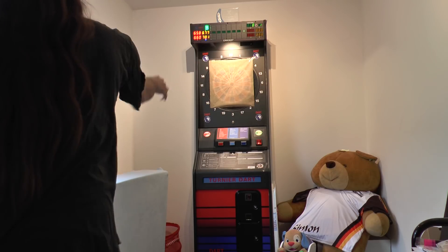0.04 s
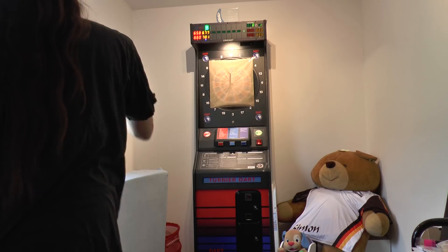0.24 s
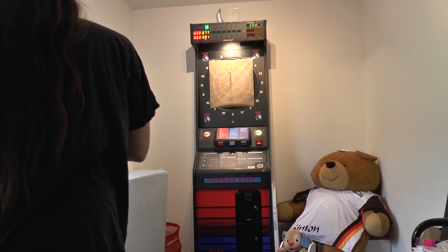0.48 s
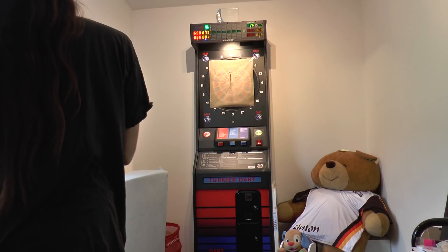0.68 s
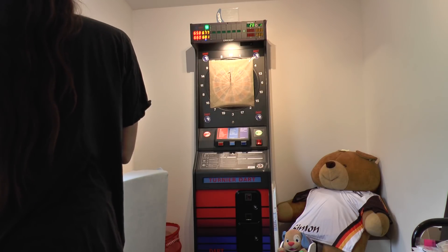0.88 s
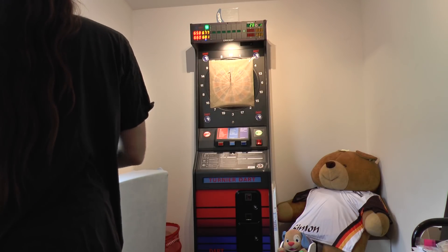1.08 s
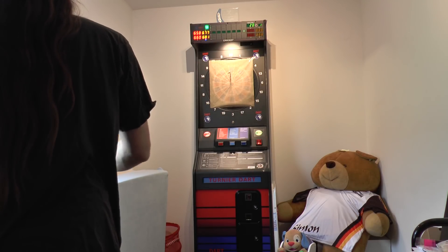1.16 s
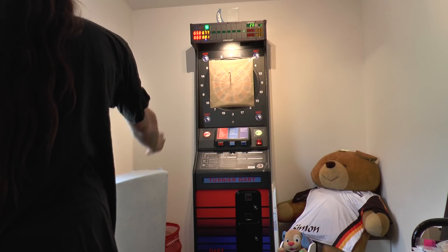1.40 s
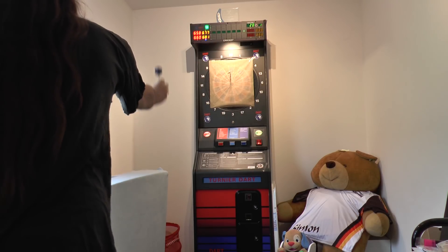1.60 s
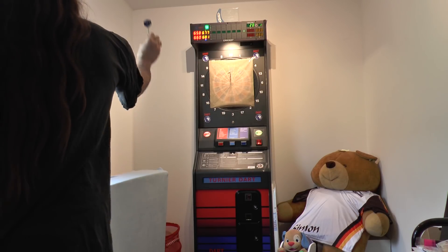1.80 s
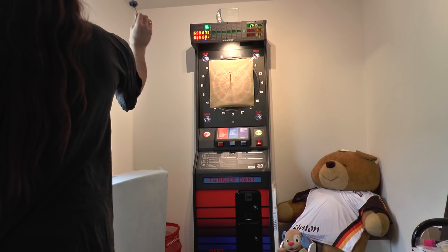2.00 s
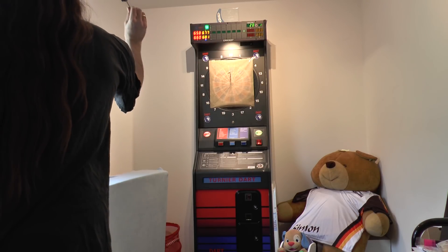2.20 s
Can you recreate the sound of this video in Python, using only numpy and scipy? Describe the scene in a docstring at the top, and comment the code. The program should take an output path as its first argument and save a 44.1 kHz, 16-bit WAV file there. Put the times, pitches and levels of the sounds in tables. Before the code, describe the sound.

Dart hit on an electronic dartboard, loud plastic crack, settling clicks, then faint rustle and scrape

```python
"""Dart into an electronic board.

A dart tears a paper sheet and hits a plastic board in a small, bare room: the segment cracks and
the cabinet booms (decaying sines), then the dart settles with a few clicks (filtered impulses).
The thrower draws the next dart: flights rustle, barrels scrape, clothes brush, feet shift (random slips).
Fan tones of the machine (wavering sines) and room air (filtered noise) run throughout."""
import sys
import numpy as np
from scipy import signal
from scipy.fft import rfft, irfft
from scipy.io import wavfile

SR = 44100
rng = np.random.default_rng(int(sys.argv[2]) if len(sys.argv) > 2 else 0)


def bounce(signal):
    """Save signal as a 16-bit WAV file at the path given by the first command-line argument."""
    frames = np.transpose(np.atleast_2d(signal))
    limited = np.clip(frames, -1, 1)
    pcm = np.round(limited * 32767).astype(np.int16)
    wavfile.write(sys.argv[1], SR, pcm)


N = 99225
TIME = np.arange(N) / SR  # s


def amp(db):
    """Decibels to gain."""
    return 10 ** (np.asarray(db) / 20)


def unit(x):
    """Scales to rms 1."""
    return x / np.sqrt(np.mean(x ** 2) + 1e-20)


def read(points, hz):
    """Interpolates a table on a log-frequency axis."""
    f, value = np.transpose(points)
    return np.interp(np.log(hz + 1), np.log(f + 1), value)


def envelope(points):
    """Gain over time from a table of t/s, level/dB."""
    return amp(np.interp(TIME, *np.transpose(points)))


def through(x, response):
    """Convolves with a response scaled to energy 1."""
    return signal.fftconvolve(x, response / np.linalg.norm(response))[:N]


def colour(x, points, size=4096):
    """Minimum-phase filter with the given spectrum shape, energy 1."""
    hz = abs(np.fft.fftfreq(size, 1 / SR))
    log_gain = np.log(amp(read(points, hz)))
    spectrum = np.exp(np.conj(signal.hilbert(log_gain)))
    return through(x, np.fft.ifft(spectrum).real[:size // 2])


def high_pass(x, hz):
    """Removes the bass, second order."""
    return signal.sosfilt(signal.butter(2, hz, "high", fs=SR, output="sos"), x)


def ring(modes):
    """Impulse response of damped modes: one second of decaying sines."""
    t = TIME[:SR]
    response = np.zeros(SR)
    for hz, db, t60 in modes:
        decay = np.exp(-np.log(1000) * t / t60)
        response += amp(db) * decay * np.sin(2 * np.pi * hz * t)
    return response


def clicks(rows):
    """One impulse for each (t/s, level/dB)."""
    out = np.zeros(N)
    for s, db in rows:
        out[round(s * SR)] += amp(db)
    return out


def drift(per_s):
    """Slow random waver of rms 1: noise under a Gaussian low-pass."""
    spectrum = rfft(rng.standard_normal(N))
    hz = np.fft.rfftfreq(N, 1 / SR)
    return unit(irfft(spectrum * np.exp(-(hz / per_s) ** 2), N))


RUB_ATTACK_S = .002


def rub(start_s, length_s, db, slips_per_s, spread_db, release_s):
    """Friction: a gated stroke of tiny random slips of uneven strength."""
    hits = rng.random(N) < slips_per_s / SR
    signs = rng.choice([-1, 1], N)
    strengths = amp(spread_db * np.minimum(rng.exponential(1, N), 3))
    attack = np.clip((TIME - start_s) / RUB_ATTACK_S, 0, 1)
    release = np.exp(-np.maximum(TIME - start_s - length_s, 0) / release_s)
    return amp(db) * attack * release * unit(hits * signs * strengths)


# Reverberation time: f/Hz, t60/s
ROOM_T60_S = [(80, 0.2), (210, 0.59), (560, 0.45), (1500, 0.36), (3500, 0.46), (7000, 0.29), (11000, .36),
              (16000, 0.35)]
ROOM_GAP_S, REFLECTIONS_PER_S = 0.0016, 5000


def tail():
    """Sparse wall reflections, each band dying at its own speed."""
    signs = rng.choice([-1., 1.], SR)
    present = rng.random(SR) < REFLECTIONS_PER_S / SR
    taps = signs * present * (TIME[:SR] > ROOM_GAP_S)
    hz, t, bands = signal.stft(taps, SR, nperseg=256)
    decay = np.exp(-np.log(1000) * t / read(ROOM_T60_S, hz)[:, None])
    return signal.istft(bands * decay, SR, nperseg=256)[1]


def stereo(mid, side, width):
    """Mid and side to left and right, side level set per frequency."""
    hz = np.fft.rfftfreq(2 * N, 1 / SR)
    side = irfft(rfft(side, 2 * N) * amp(read(width, hz)))[:N]
    return np.array([mid + side, mid - side])


# Stereo width of the reflections: f/Hz, side gain/dB
ECHO_WIDTH_DB = [(60, -23), (200, -20), (600, -14.5), (1500, -11), (3000, -11), (8500, -12), (11000, -35)]


def echoes(x):
    """What the walls send back: independent tails for mid and side."""
    return stereo(through(x, tail()), through(x, tail()), ECHO_WIDTH_DB)


def room(x, wet_db):
    """Direct sound plus the reflections."""
    return x + amp(wet_db) * echoes(x)


# Fan tones before swell and flutter: f/Hz, level/dB
FAN_TONES = [(157, -67), (243, -64.5)]
# Common swell of the fan tones: t/s, level/dB
FAN_SWELL_DB = [(0, -7), (.13, 6), (.7, -5.5), (.98, 3), (1.3, -5.5), (1.7, 1), (1.87, 6), (2.0, -0.5),
                (2.25, -2.5)]
FAN_WAVER_HZ, FAN_FLUTTER_DB, WAVER_PER_S = 1.8, 2.5, 5
# Spectrum shape of the room air: f/Hz, level/dB
AIR_SPECTRUM_DB = [(20, -41), (42, -6), (60, -13), (100, -3), (140, -1), (190, -6), (260, -5), (380, -15.5),
                   (700, -21.5), (1800, -20.5), (4000, -27.5), (7000, -31.5), (8600, -33.5), (10500, -29.5),
                   (14500, -32), (16000, -41.5)]
# Stereo width of the air: f/Hz, side gain/dB
AIR_WIDTH_DB = [(60, -12.5), (150, -13), (380, 0.5), (800, 1), (2400, -10.5), (6000, -8.5), (11000, -22)]
AIR_DB = -62


def background():
    """Fan tones wavering in pitch and level, over filtered-noise room air."""
    hum = np.zeros(N)
    for hz, db in FAN_TONES:
        level = amp(db + FAN_FLUTTER_DB * drift(WAVER_PER_S))
        pitch_hz = hz + FAN_WAVER_HZ * drift(WAVER_PER_S)
        hum += level * unit(np.sin(2 * np.pi * np.cumsum(pitch_hz) / SR))
    hum *= envelope(FAN_SWELL_DB)
    mid, side = (amp(AIR_DB) * colour(x, AIR_SPECTRUM_DB) for x in rng.standard_normal((2, N)))
    return stereo(mid + hum, side, AIR_WIDTH_DB)


# Clothes, level over time: t/s, level/dB
SLEEVE_DB = [(0, -58.5), (.07, -60.5), (.16, -65.5), (.6, -61.5), (1.05, -68), (1.27, -72.5), (1.34, -65),
             (1.5, -64.5), (1.6, -69.5), (1.7, -68), (1.95, -75), (2.25, -100)]
# Spectrum shape of the cloth: f/Hz, level/dB
CLOTH_SPECTRUM_DB = [(100, 2.5), (400, -3), (700, -4), (1700, -4), (2400, -7), (3200, -5), (4200, -14.5),
                     (6500, -11.5), (9000, -19), (15000, -30)]
# Soft shuffles of the feet: start t/s, length/s, level/dB
FOOT_SHUFFLES = [(1.109, 0.022, -57), (2.06, .014, -55), (2.076, .006, -59)]
# Spectrum shape of the shuffles: f/Hz, level/dB
SHUFFLE_SPECTRUM_DB = [(60, -8.5), (300, 5), (550, 0.5), (1100, 2), (2000, -8), (3300, -12), (5000, -25),
                       (15000, -51)]


def thrower():
    """Friction of clothes as the arm moves; short rubs as the feet shift."""
    cloth = rub(0, N / SR, 0, slips_per_s=6400, spread_db=1.5, release_s=0.0025)
    cloth = cloth * envelope(SLEEVE_DB)
    feet = sum(rub(*row, slips_per_s=4000, spread_db=4, release_s=0.0044) for row in FOOT_SHUFFLES)
    brushing = room(colour(cloth, CLOTH_SPECTRUM_DB), wet_db=-5)
    return brushing + room(colour(feet, SHUFFLE_SPECTRUM_DB), wet_db=-6)


# Barrels sliding on each other: start t/s, length/s, level/dB, shaft drive/dB, barrel drive/dB
BARREL_SCRAPES = [(0.765, 0.016, -56.5, -5, 11), (0.784, 0.045, -51.5, -2.5, 4.5),
                  (0.83, 0.026, -42.5, -5.5, -9), (0.864, 0.006, -44.5, 1.5, -12.5),
                  (0.872, 0.018, -47, 2.5, -21)]
# Spectrum shape of the scrape: f/Hz, level/dB
SCRAPE_SPECTRUM_DB = [(200, -13), (600, -14.5), (1000, -18), (2500, 2.5), (4000, 3.5), (5100, 7.5),
                      (6400, 2.5), (7500, 4), (10000, -3.5), (15500, -13.5)]
# Shaft modes: f/Hz, relative level/dB, t60/s
SHAFT_MODES = [(1030, -5, 0.014), (1841, -0.5, 0.047), (1990, 5, 0.024), (2290, 2, 0.027),
               (3470, -7, 0.019)]
# Barrel modes: f/Hz, relative level/dB, t60/s
BARREL_MODES = [(5500, -9, 0.024), (5430, -7, 0.019), (5840, 2, 0.019), (7230, -8, 0.014),
                (8960, -9, 0.0088)]
SHAFT_DB, BARREL_DB, SCRAPE_DB = -4, -6.5, -2.5
SHAFT_CUT_HZ = 800
# Spectrum shape of the first metal touch: f/Hz, level/dB
CLINK_SPECTRUM_DB = [(500, -37), (4000, -24), (8000, -1), (11000, 8), (15500, -1.5)]
CLINK_S, CLINK_LENGTH_S, CLINK_DB = .7685, .01, -49


def barrels():
    """One dart touches another and slides along it; slips excite barrel and shaft modes."""
    slips = np.array([rub(*row[:3], slips_per_s=7900, spread_db=3.5, release_s=0.0051)
                      for row in BARREL_SCRAPES])
    shaft_drive, barrel_drive = amp(np.transpose(BARREL_SCRAPES)[3:]) @ slips
    barrel = amp(BARREL_DB) * through(barrel_drive, ring(BARREL_MODES))
    shaft = amp(SHAFT_DB) * through(shaft_drive, high_pass(ring(SHAFT_MODES), SHAFT_CUT_HZ))
    scrape = amp(SCRAPE_DB) * colour(slips.sum(0), SCRAPE_SPECTRUM_DB)
    touch = rub(CLINK_S, CLINK_LENGTH_S, CLINK_DB, slips_per_s=5000, spread_db=4, release_s=0.0065)
    return room(scrape + barrel + shaft + colour(touch, CLINK_SPECTRUM_DB), wet_db=-2.5)


# Flights rubbing past each other: start t/s, length/s, level/dB
FLIGHT_RUSTLES = [(.511, 0.0069, -44), (0.517, 0.012, -37.5), (0.53, 0.028, -36.5), (.592, 0.03, -45),
                  (0.65, 0.028, -47)]
# A flight snaps free: t/s, level/dB
FLIGHT_FLICKS = [(.517, -13), (.532, -17), (.553, -35), (.598, -25)]
# Spectrum shape of the flights: f/Hz, level/dB
FLIGHT_SPECTRUM_DB = [(100, -16), (700, -13), (1250, -7), (1700, 3), (2200, 1), (2600, -3.5), (3300, 1.5),
                      (4000, -4), (4700, -8.5), (7500, -10.5), (10000, -20.5), (15500, -31.5)]


def flights():
    """Plastic flights in the hand: friction strokes plus an impulse per snap."""
    strokes = sum(rub(*row, slips_per_s=2000, spread_db=1.5, release_s=0.0043) for row in FLIGHT_RUSTLES)
    return room(colour(strokes + clicks(FLIGHT_FLICKS), FLIGHT_SPECTRUM_DB), wet_db=-2)


# The dart rocks in its hole: t/s, level/dB
SETTLE_CLICKS = [(.234, -24), (.268, -13), (.351, -20.5), (.3637, -14), (.394, -34.5), (.4191, -19.5)]
# Spectrum shape of a click: f/Hz, level/dB
SETTLE_SPECTRUM_DB = [(100, -41.5), (500, -5.5), (1000, 2), (1900, 8.5), (3000, -4.5), (4500, -11),
                      (8300, -12.5), (11000, -25.5), (15000, -28.5)]


def settling():
    """Small plastic clicks, filtered impulses, as the dart comes to rest."""
    return room(colour(clicks(SETTLE_CLICKS), SETTLE_SPECTRUM_DB), wet_db=9)


HIT_S = .1965
# Segment and cabinet modes: f/Hz, relative level/dB, t60/s
BOARD_MODES = [(87, -2.5, 0.5), (171.1, 1.5, 0.15), (206.5, 0, 0.3), (212.8, -5.5, 0.75),
               (273.5, -3.5, 0.3), (350, 1.5, 0.23), (439.2, -2, 0.45), (550, 1, 0.37), (590, -4, .28),
               (615, -3, .3), (648, -4.5, .3), (908, -3, 0.43), (1347, -4, .28), (1462, -4.5, 0.45),
               (1820, -2, .36), (1836, -12, 0.44), (2280, -11.5, 0.38), (3340, -10.5, .25)]
BOARD_DB, BOARD_RISE_S, BOARD_CUT_HZ = -27, 0.0025, 72
# A soft low bump: f/Hz, relative level/dB, t60/s
THUMP_MODES = [(50, 0, .06)]
THUMP_S, THUMP_DB = .428, -45


def board():
    """Segment and cabinet modes build up and ring on after the blow; a low bump follows."""
    rise = 1 - np.exp(-TIME[:SR] / BOARD_RISE_S)
    response = high_pass(ring(BOARD_MODES) * rise, BOARD_CUT_HZ)
    boom = signal.fftconvolve(clicks([(HIT_S, BOARD_DB)]), response)
    bump = signal.fftconvolve(clicks([(THUMP_S, THUMP_DB)]), ring(THUMP_MODES))
    return (boom + bump)[:N]


# Spectrum shape of the paper tear: f/Hz, level/dB
PAPER_SPECTRUM_DB = [(200, 15), (1200, 5.5), (3000, -5), (7000, -16.5), (14000, -3), (16000, -6)]
PAPER_LEAD_S, PAPER_DB = 0.0051, -22
# Spectrum shape of the tip grinding into its hole: f/Hz, level/dB
GRIND_SPECTRUM_DB = [(500, -24), (2500, 7.5), (4500, -5.5), (6800, 2.5), (9500, 2.5), (12000, -10.5),
                     (14500, -5.5), (16000, -11.5)]
GRIND_S, GRIND_DB = 0.0033, -19.5
# Tip, segment and backing plate: t after the hit/s, relative level/dB
CONTACT_KNOCKS = [(0, -3), (.0014, 0), (.0033, -11)]
# Modes of the struck plastic: f/Hz, relative level/dB, t60/s
SEGMENT_MODES = [(578, -2, 0.019), (1240, -5.5, 0.025), (1760, 2, .02), (3352, -11, 0.016),
                 (6440, -11, 0.0036)]
SEGMENT_DB, SEGMENT_CUT_HZ = -6, 380  # the cut keeps the snap free of low thud
# Spectrum shape of what the blow sends into the room: f/Hz, level/dB
CRACK_SPECTRUM_DB = [(40, -33.5), (65, -23), (100, -15), (180, -1), (280, -5), (430, -7), (590, -1),
                     (760, -4), (1000, -4.5), (1300, -2), (1750, -1.5), (2200, -4.5), (2600, -10.5),
                     (3300, -9.5), (4200, -18), (6500, -15), (8600, -19.5), (12000, -30.5), (16000, -32.5)]
HIT_ROOM_DB = 14.5


def dart():
    """The tip tears the paper, then drives a segment against its backing: slips, knocks and modes."""
    tear = rub(HIT_S - PAPER_LEAD_S, PAPER_LEAD_S, PAPER_DB,
               slips_per_s=11000, spread_db=3, release_s=.001)
    grind = rub(HIT_S - RUB_ATTACK_S / 2, GRIND_S, GRIND_DB,
                slips_per_s=14000, spread_db=4.5, release_s=.0012)
    knocks = clicks([(HIT_S + delay, SEGMENT_DB + db) for delay, db in CONTACT_KNOCKS])
    snap = high_pass(signal.fftconvolve(knocks, ring(SEGMENT_MODES))[:N], SEGMENT_CUT_HZ)
    walls = echoes(colour(clicks([(HIT_S, HIT_ROOM_DB)]), CRACK_SPECTRUM_DB))
    paper = room(colour(tear, PAPER_SPECTRUM_DB), wet_db=-8)
    return snap + colour(grind, GRIND_SPECTRUM_DB) + walls + paper


def scene():
    """Sums all sources, a touch to the right."""
    mix = dart() + board() + settling() + flights() + barrels() + thrower() + background()
    return mix * amp([[-.25], [.25]])  # left, right/dB


EDGE_HZ = 16000


def record(dry):
    """Soft overload, then a linear-phase low-pass."""
    held = dry / (1 + abs(dry) ** 6) ** (1 / 6)
    low_pass = signal.firwin(511, EDGE_HZ, window=("kaiser", 9), fs=SR)
    return signal.oaconvolve(held, low_pass[None], "same")


dry = scene()
out = record(dry)
bounce(out)
```